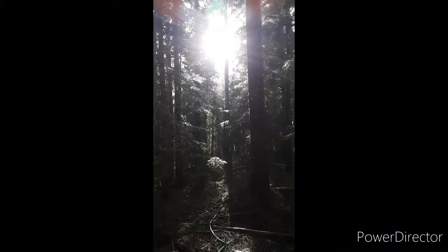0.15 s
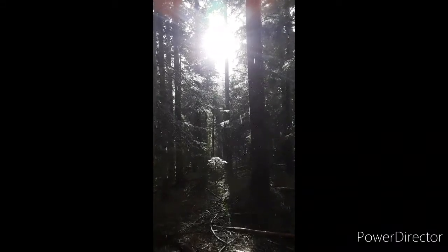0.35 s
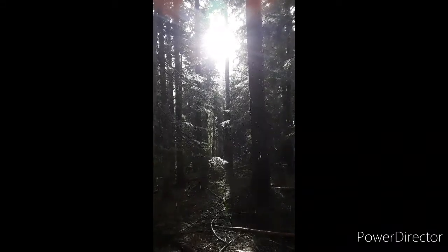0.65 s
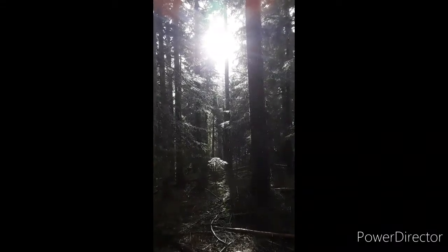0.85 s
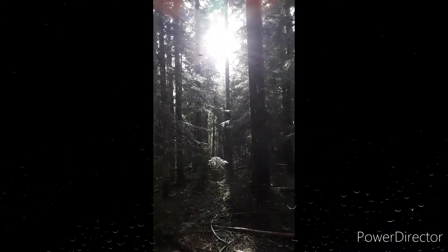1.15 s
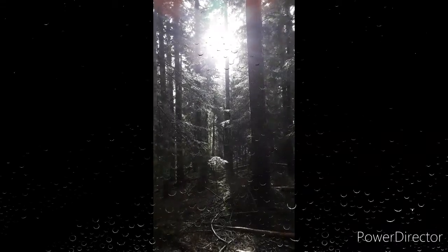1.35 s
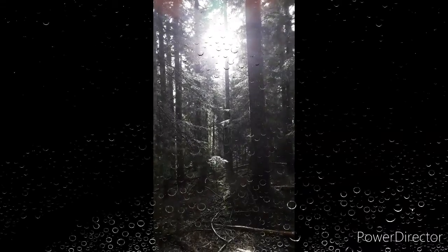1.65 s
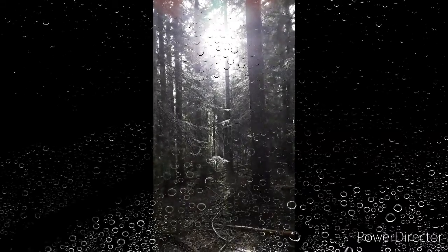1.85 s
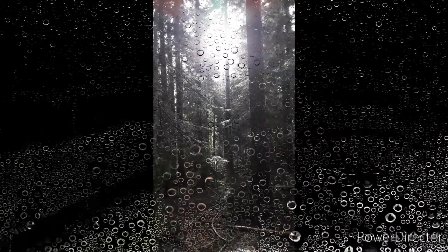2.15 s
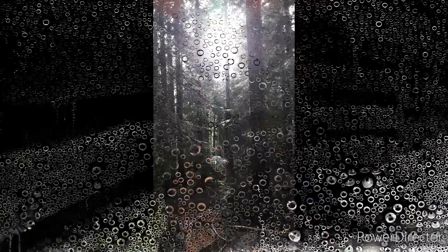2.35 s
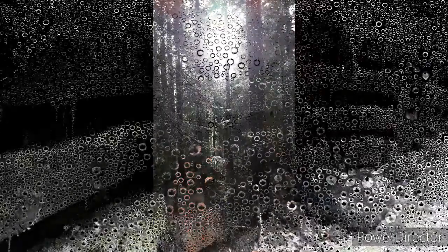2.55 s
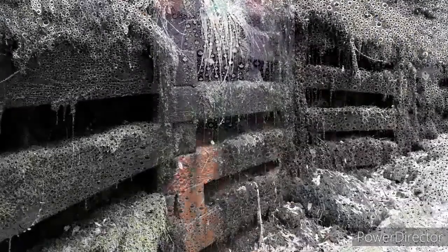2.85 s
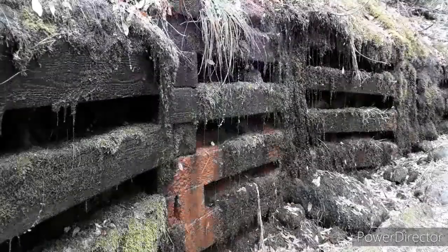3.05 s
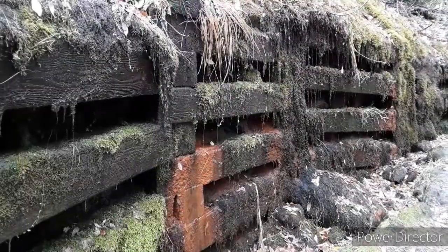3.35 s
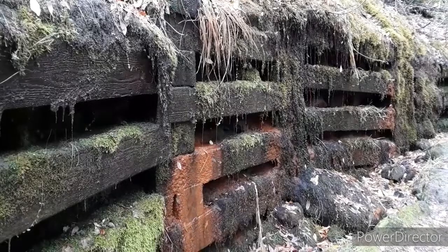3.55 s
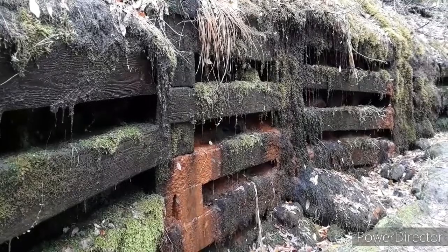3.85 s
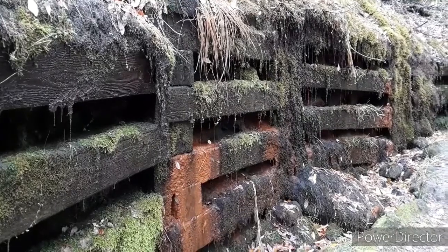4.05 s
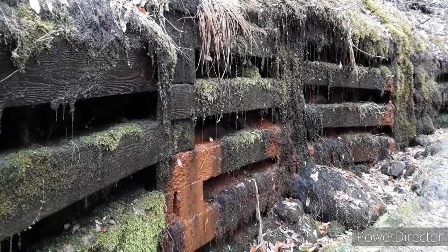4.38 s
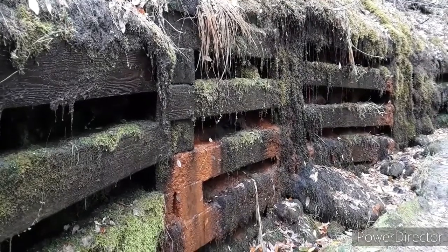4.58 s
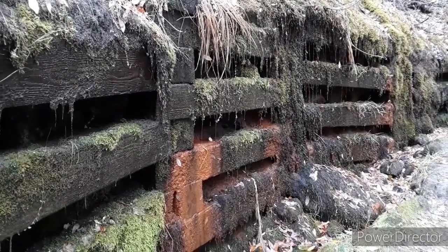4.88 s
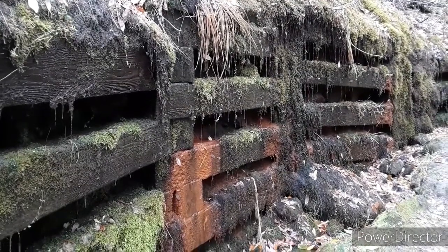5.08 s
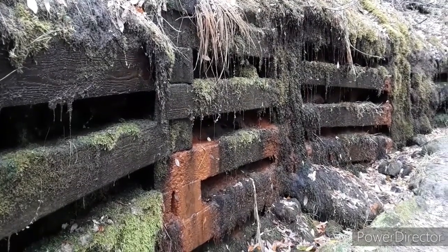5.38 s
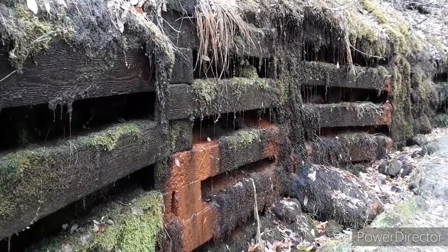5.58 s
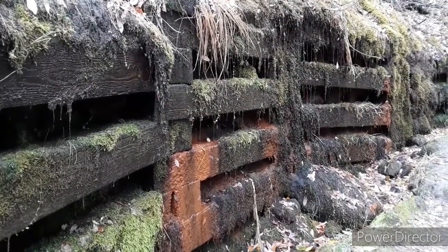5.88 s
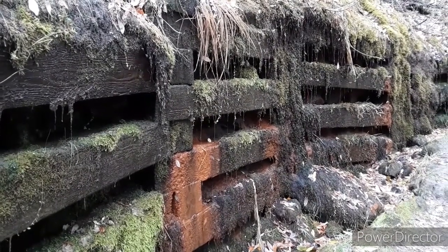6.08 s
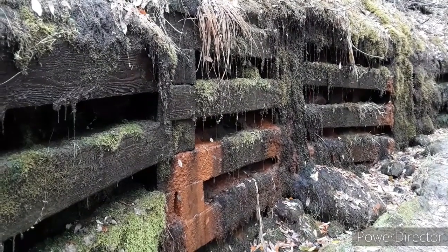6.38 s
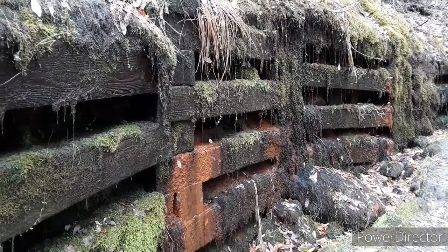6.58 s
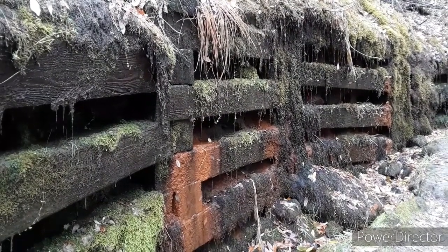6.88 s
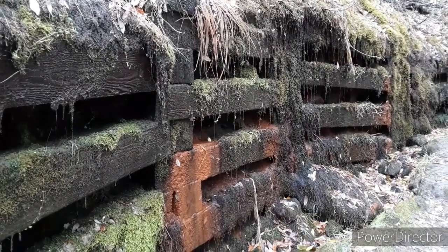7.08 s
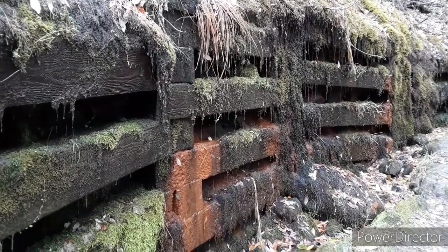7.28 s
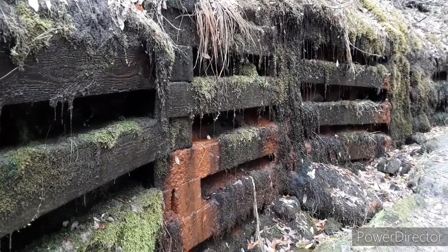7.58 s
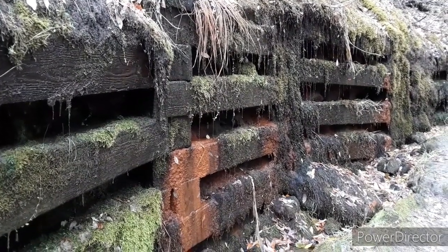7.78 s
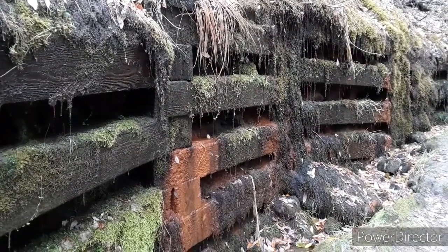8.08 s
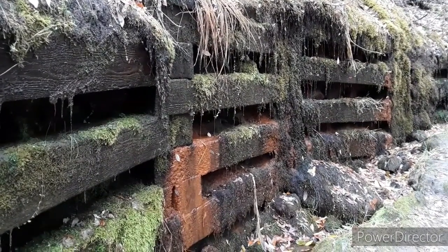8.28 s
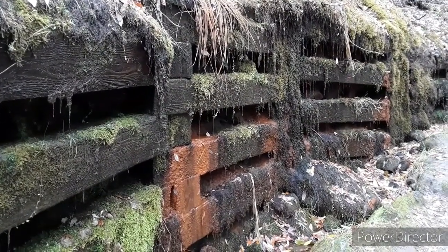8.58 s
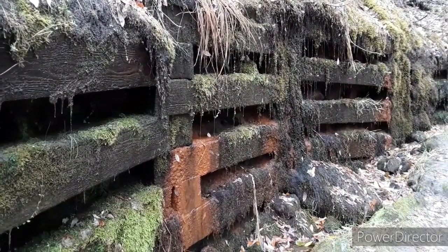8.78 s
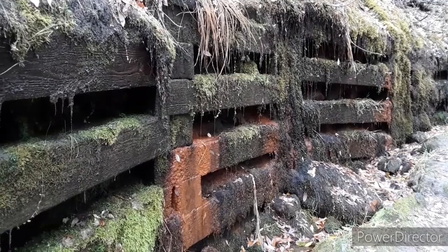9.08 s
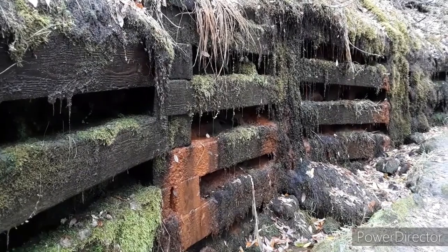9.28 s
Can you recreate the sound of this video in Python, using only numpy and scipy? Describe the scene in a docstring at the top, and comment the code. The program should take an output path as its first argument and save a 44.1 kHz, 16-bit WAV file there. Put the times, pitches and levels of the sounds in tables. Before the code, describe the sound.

A quiet forest rush with scattered leaf ticks cuts abruptly to a close, bubbling trickle, with plopping drops and sharp little splats on wet wood.

```python
"""A mossy timber wall on the left, running with water: drops plop into pools between its beams and
splat on wet wood, over a bubbling trickle, a fine patter and a stream. Before it, after a very short
silence, comes another wet place: a distant stream and sparse drops ticking on leaf litter.
Bubbles are decaying sines that climb in pitch, impacts are brief noise bursts, streams are shaped noise;
drops and running water get short diffuse echoes."""
import sys
import numpy as np
from scipy import signal
from scipy.fft import rfft, irfft, next_fast_len
from scipy.io import wavfile
from scipy.ndimage import map_coordinates

SR = 44100
rng = np.random.default_rng(int(sys.argv[2]) if len(sys.argv) > 2 else 0)


def dump(signal):
    """Clip the signal to [-1, 1] and save it as 16-bit WAV at the path in sys.argv[1]."""
    limited = np.clip(np.atleast_2d(signal).T, -1, 1)
    pcm = np.round(limited * 32767).astype(np.int16)
    wavfile.write(sys.argv[1], SR, pcm)


N = 415863

# the forest floor stops, the wall starts [s]; upper limit of the sound [Hz]
LEAVE_S, ARRIVE_S = 1.964, 2.022
TOP_HZ = 15700
# lesser drops differ by chance: in level [dB], and in life [log units]
DROP_SPREAD_DB, LIFE_SPREAD = 1.5, .3
# the wall's sound, big drops apart, fades in to a steady level, then only wavers
STEADY_DB, FADE_IN_DB, FADE_IN_S = 1, 8.5, 0.19
# slow waver in level of the wall's sound and of the forest's rush: depth [dB], knots per second
WAVER_DB, WAVER_PER_S = 0.33, 1.82
# splats: left over right [dB], scale of the droplets' random flight time [s], length of the ping [cycles]
SPLAT_PAN_DB, SPATTER_FLIGHT_S, PING_CYCLES = 9.5, .006, 12
# the higher a leaf rings, the lighter it is and the less it stirs the litter
LITTER_DB_PER_OCTAVE = -8

# steady rush among the trees, relative spectrum: [f/Hz, level/dB]
FOREST_SPECTRUM = [(25, -53), (60, -6), (130, -4), (230, -6.5), (370, 0.5), (520, 0.5), (780, 5.5),
                   (1500, 2), (1950, 6), (2600, -2), (3800, -9), (5200, -8.5), (6500, -9), (9000, -7.5),
                   (15000, -6)]
# likeness of left and right in the forest's rush: [f/Hz, correlation -1..1]
FOREST_CORRELATION = [(80, 0.82), (280, 0.91), (750, 0.73), (1300, 0.4), (2000, -0.18), (3500, -0.021)]
# lean of the forest's rush, mostly to the right: [f/Hz, left-right level/dB]
FOREST_LEAN = [(300, -1), (900, -1), (2000, -6), (3800, 0), (6300, -5), (9000, 0)]
# low part of the forest's rush, rising and falling: [t/s, level/dB]
LOW_RUSH_LEVEL = [(0, -62), (.45, -76), (.68, -68), (.78, -56), (.9, -68), (1.5, -66), (1.96, -63.5)]
# thin high hiss at the start, its fade: [t/s, level/dB]
HISS_FADE = [(0, -61), (.22, -60), (.29, -90)]
# narrow band of that hiss, relative spectrum: [f/Hz, level/dB]
HISS_SPECTRUM = [(7200, -60), (7750, -3), (8000, 0), (8500, -6), (9200, -60)]
# loudest drops on leaf litter:
# [t/s, tick level/dB, ring level/dB, leaf or twig f/Hz, treble snap level/dB]
LEAF_DROPS = [(0.0897, -31, -30, 1750, -53), (0.1872, -39, -35, 6650, -42), (0.1939, -36, -45, 6600, -31),
              (0.232, -42, -41, 4200, -48), (0.434, -33, -35, 6100, -45), (0.586, -38, -42, 5350, -43),
              (0.6205, -47, -50, 6400, -30), (0.717, -42, -42, 6100, -35), (0.7285, -35, -44, 6000, -36),
              (0.76, -46, -37, 3200, -51), (0.9176, -37, -32, 6750, -35), (0.9597, -43, -34, 1800, -46),
              (1.1351, -31, -42, 6900, -38), (1.1898, -34, -36, 6000, -42), (1.376, -40, -48, 7400, -34),
              (1.5076, -31, -33, 2700, -52), (1.6487, -27, -29, 6250, -32), (1.657, -35, -44, 1650, -40),
              (1.7963, -33, -39, 6900, -37), (1.8246, -24, -25.5, 2350, -41)]
# colour of a drop on a stiff leaf: [f/Hz, level/dB]
LEAF_COLOUR = [(500, -18), (1500, -6), (3500, -0.5), (5000, 3), (6500, 6.5), (9000, 1.5), (15000, -12)]
# colour of the litter giving way under the drop: [f/Hz, level/dB]
LITTER_COLOUR = [(300, -26), (1100, -12), (1900, 0), (2800, -2), (4000, -3), (6000, -11), (12000, -30)]
# stream behind the wall, relative spectrum: [f/Hz, level/dB]
STREAM_SPECTRUM = [(25, -17), (50, -13.5), (80, -4.5), (125, 2.5), (230, -2), (380, 3), (520, 1.5),
                   (720, 2.5), (1050, 2), (1900, 7), (2700, 1.5), (6500, -3.5), (9000, -7), (15000, -2)]
# likeness of left and right in the stream: [f/Hz, correlation -1..1]
STREAM_CORRELATION = [(80, 0.97), (260, 0.88), (500, 0.4), (800, 0.32), (1150, -0.52), (2500, -0.027)]
# colour of the fine patter: [f/Hz, level/dB]
PATTER_COLOUR = [(150, -20), (400, -24), (1000, 6.5), (2000, -4.5), (2800, -0.5), (3600, 5), (5000, -0.5),
                 (6600, 8.5), (9000, 5.5), (15000, 2.5)]
# resonant hollows between the beams: [f/Hz, bandwidth/Hz, level/dB]
BEAM_HOLLOWS = [(1418, 300, 6.5), (1970, 350, 7.5), (2140, 110, 1)]
# pinhead bubbles bursting close by: [t/s, level/dB, f/Hz]
PINHEAD_BUBBLES = [(3.511, -29, 14460), (3.759, -32, 14130), (4.362, -30, 12920), (5.676, -33, 13090),
                   (6.636, -32, 11980), (6.74, -35, 12830)]
# loudest drops that burst on wet wood: [t/s, level/dB, f/Hz, spatter level/dB]
WOOD_SPLATS = [(2.089, -34, 6500, -45), (2.271, -39, 3100, -48), (2.554, -36, 6800, -47),
               (2.724, -35, 3610, -53), (2.754, -35, 3400, -51), (2.964, -37, 3680, -52),
               (3.086, -38, 4050, -53), (3.195, -34, 5330, -54), (3.21, -37, 4430, -53),
               (3.247, -36, 3660, -54), (3.285, -36, 5510, -54), (3.295, -37, 3100, -54),
               (3.304, -37, 4180, -54), (3.358, -38, 4000, -53), (3.5181, -26, 3700, -51),
               (3.675, -34, 3960, -53), (3.7445, -34, 4180, -52), (4.0041, -27.5, 4100, -46),
               (4.124, -36, 3250, -50), (4.234, -35, 4220, -54), (4.296, -34, 4250, -48),
               (4.447, -36, 3360, -50), (4.501, -37, 3280, -48), (4.6527, -24, 6510, -53),
               (5.212, -37, 4530, -51), (5.4671, -32, 4930, -53), (5.5079, -37, 3580, -50),
               (5.54, -37, 3790, -54), (5.573, -36, 3100, -52), (5.6, -35, 3670, -50),
               (5.813, -38, 5360, -50), (5.939, -36, 4650, -53), (6.085, -38, 3660, -55),
               (6.2525, -37, 5000, -47), (6.2605, -33, 4800, -45), (6.338, -37, 5800, -47),
               (6.348, -31, 4480, -50), (6.3981, -24.5, 3600, -53), (6.45, -35, 5000, -44),
               (6.553, -36, 4400, -51), (6.588, -34, 4500, -48), (6.742, -34, 4250, -47),
               (6.765, -37, 3620, -55), (6.842, -36, 3100, -54), (6.8553, -28, 5550, -50),
               (7.0087, -35, 3110, -49), (7.175, -36, 4730, -48), (7.7331, -28, 3710, -53),
               (7.7989, -26, 4400, -47), (7.948, -34, 6370, -50), (8.184, -35, 4220, -53),
               (8.2666, -34, 4510, -47), (8.33, -35, 4290, -50), (8.4209, -32, 3250, -51),
               (8.441, -35, 5470, -53), (8.6495, -35, 3910, -52), (8.724, -35, 4240, -50),
               (9.0125, -28, 3660, -43), (9.0387, -29, 5150, -42), (9.059, -36, 4410, -51),
               (9.1029, -28, 6800, -45), (9.3081, -30, 3400, -47), (9.332, -35, 5990, -54),
               (9.402, -35, 4220, -54)]
# loudest drops that trap a bubble in pooled water: [t/s, level/dB, f/Hz, life/s]
POOL_PLOPS = [(2.11, -36, 1980, .007), (2.202, -33, 1720, .012), (2.5369, -25, 2210, .005),
              (2.5777, -26, 1390, .005), (2.766, -34, 1335, .006), (2.7684, -30, 2100, .003),
              (2.877, -36, 2300, .006), (2.908, -37, 1680, .007), (2.941, -34, 2100, .006),
              (2.9686, -32, 2200, .004), (3.077, -38, 1440, .006), (3.2234, -30, 2020, .005),
              (3.319, -36, 1500, .006), (3.319, -35, 2100, .007), (3.4851, -23, 1420, .006),
              (3.528, -35, 1450, .007), (3.679, -36, 2410, .005), (3.7434, -28.5, 1950, .0035),
              (4.1225, -32, 1950, .006), (4.353, -35, 1450, .007), (4.365, -33, 1460, .013),
              (4.48, -36, 1590, .007), (4.689, -38, 1335, .007), (5.044, -34, 1980, .006),
              (4.501, -33, 1940, .01), (4.575, -34, 1910, .005), (4.61, -36, 1300, .008),
              (4.7237, -25, 1810, .007), (4.858, -38, 1450, .006), (4.93, -45, 660, .012),
              (5.0611, -31, 2090, .01), (5.277, -33, 2230, .006), (5.332, -33, 2420, .007),
              (5.335, -39, 1340, .006), (5.5083, -21, 1940, .0045), (5.578, -37, 1420, .006),
              (5.7773, -31, 1870, .0035), (5.798, -37, 1310, .007), (6.081, -36, 1520, .006),
              (6.103, -35, 2160, .005), (6.157, -35, 1760, .005), (6.3485, -30, 1750, .0025),
              (6.385, -45, 780, .012), (6.412, -38, 1335, .006), (6.4369, -27, 1870, .004),
              (6.589, -32, 1320, .012), (6.668, -34, 2030, .006), (6.68, -36, 1680, .006),
              (6.7627, -33, 2200, .007), (6.861, -33, 1970, .005), (7.0091, -23, 2080, .005),
              (7.1891, -29, 2130, .004), (7.21, -32, 2020, .006), (7.2512, -30, 2170, .007),
              (7.324, -37, 1420, .007), (7.344, -35, 1320, .012), (7.522, -36, 1380, .008),
              (7.736, -34, 1940, .005), (7.825, -35, 1430, .007), (7.955, -33, 2010, .005),
              (8.084, -44, 780, .014), (8.1115, -31, 2000, .006), (8.499, -35, 2320, .005),
              (8.532, -35, 2050, .005), (8.571, -33, 1940, .005), (8.648, -21, 2000, .002),
              (8.67, -35, 1890, .005), (8.8159, -27, 2380, .0035), (8.86, -35, 1820, .005),
              (8.8617, -33, 1300, .012), (8.91, -36, 1340, .005), (8.9587, -23, 1790, .01),
              (9.024, -35, 2010, .005), (9.259, -38, 1450, .006), (9.3088, -24, 2140, .0035),
              (9.344, -33, 1150, .012), (9.407, -32, 1640, .009)]
# high plop notes are shaded from the right side: [f/Hz, left-right level/dB]
RIGHT_SHADE = [(700, -2), (1100, 2), (1400, 16), (2000, 16)]
# colour of a drop smacking on water: [f/Hz, level/dB]
SMACK_COLOUR = [(300, -35), (1200, -14), (2500, 1), (4500, -1), (7000, -1), (15000, -12)]
# scatter from timber and trees: [f/Hz, 60 dB decay time/s]
SCATTER_DECAY = [(300, 0.1), (2000, 0.1), (7000, 0.069), (14000, 0.064)]
# treble loss in the microphone: [f/Hz, level/dB]
MICROPHONE_COLOUR = [(6800, -1.5), (7400, -8.5), (8200, -10), (12000, -9), (15500, -15)]


def amp(db):
    """Decibels to gain."""
    return 10 ** (np.asarray(db) / 20)


def unit(x):
    """Scale to rms 1."""
    return x / np.sqrt(np.mean(x ** 2) + 1e-20)


def along(points, hz):
    """(Hz, value) points read on a log axis."""
    f, v = np.transpose(points)
    return np.interp(np.log(hz + 1), np.log(f + 1), v)


def curve(points):
    """(s, value) points joined by straight lines, one value per sample."""
    return np.interp(np.arange(N) / SR, *np.transpose(points))


def wobble(rate):
    """A smooth random curve, rate knots a second."""
    knots = rng.standard_normal(int(N * rate / SR) + 4)
    return map_coordinates(knots, [np.arange(N) * rate / SR])


def sides(pan_db):
    """Gains of the two channels, the left one louder by pan_db."""
    return amp(np.array([[.5], [-.5]]) * pan_db)


def filtered(x, response):
    """x times a response of frequency."""
    m = next_fast_len(N + SR // 2)
    return irfft(rfft(x, m) * response(np.fft.rfftfreq(m, 1 / SR)), m)[..., :N]


def coloured(x, points):
    """Causal minimum-phase filter with the gain of (Hz, dB) points, so that attacks stay sharp."""
    size = 1024
    cepstrum = irfft(np.log(amp(along(points, np.fft.rfftfreq(size, 1 / SR)))))
    # fold the cepstrum onto positive times
    cepstrum[1:size // 2] *= 2
    cepstrum[size // 2 + 1:] = 0
    impulse = irfft(np.exp(rfft(cepstrum)))
    return signal.oaconvolve(x, impulse[None], axes=1)[:, :N]


def rush(spectrum, correlation):
    """Stereo noise of rms 1; the mix of mid and side sets how alike the channels are."""
    def mid_side_gains(hz):
        turn = np.arccos(np.clip(along(correlation, hz), -1, 1)) / 2
        return amp(along(spectrum, hz)) * [np.cos(turn), np.sin(turn)]

    mid, side = filtered(rng.standard_normal((2, N)), mid_side_gains)
    return unit(np.array([mid + side, mid - side]))


def ring(hz, life, rise, size):
    """One row per bubble: it swells within a cycle, climbs in pitch by rise and dies over its life."""
    t = np.arange(size) / SR
    hz, life = hz[:, None], life[:, None] + 1e-5
    age = t / life
    phase = 2 * np.pi * hz * t * (1 + rise * np.tanh(age / 2))
    swell = 1 - np.exp(-2 * hz * t)
    return np.sin(phase) * swell * np.exp(-age ** 2)


def spray(count, life, size):
    """One row per impact: a burst of noise that dies at once."""
    return rng.standard_normal((count, size)) * np.exp(-np.arange(size) / SR / life)


def placed(rows, s, left_db, right_db, lag_s):
    """Lay each row at its time; the right side is offset by lag_s (negative leads) with a random spread."""
    size = rows.shape[1]
    lag = np.round(SR * (lag_s + 0.00011 * rng.standard_normal(len(s)))).astype(int)
    start = np.round(s * SR).astype(int)

    def lay(at, db):
        where = np.maximum(at, 0)[:, None] + np.arange(size)
        return np.bincount(where.ravel(), (rows * amp(db)[:, None]).ravel(), N)[:N]

    return np.array([lay(start, left_db), lay(start + lag, right_db)])


def scattered(x, wet_db):
    """Add short diffuse echoes; drops land in different spots, so each stretch gets its own pattern."""
    size, length = SR // 30, SR // 8
    count = N // size + 1
    # noise tails that decay at a different rate in each band
    hz, t, z = signal.stft(rng.standard_normal((2, count, length)), SR, nperseg=128)
    decay = amp(-60 * t / along(SCATTER_DECAY, hz)[:, None])
    tails = signal.istft(z * decay, SR, nperseg=128)[1]
    tails /= np.linalg.norm(tails, axis=2, keepdims=True)
    tails = np.pad(tails, ((0, 0), (0, 0), (SR // 500, 0)))  # 2 ms before the first echo
    stretches = np.pad(x, ((0, 0), (0, count * size - N))).reshape(2, count, size)
    echoes = signal.fftconvolve(stretches, tails, axes=2)
    where = (size * np.arange(count)[:, None] + np.arange(echoes.shape[2])).ravel()
    wet = np.array([np.bincount(where, side.ravel())[:N] for side in echoes])
    return x + amp(wet_db) * wet


def crackle(count, life, spread_db, pan_db):
    """Pitchless clicks of tiny droplets at random times."""
    s = rng.uniform(0, N / SR, count)
    db = spread_db * np.minimum(rng.standard_normal(count), 2)
    right_db = db - pan_db - 3 * rng.standard_normal(count)
    return unit(placed(spray(count, life, size=160), s, db, right_db, lag_s=0))


def shower(count, pitch_hz, spread, cycles, spread_db, pan_db, rise, size):
    """Many small drops at random times, each with its own pitch, life, size and direction."""
    s = rng.uniform(0, N / SR, count)
    pitch, life, level, pan = rng.standard_normal((4, count))
    hz = np.minimum(pitch_hz * np.exp(spread * pitch), TOP_HZ)
    rows = ring(hz, cycles * np.exp(0.065 * life) / hz, rise, size)
    db = spread_db * np.minimum(level, 2)  # the biggest drops are rare and bounded in size
    return unit(placed(rows, s, db, db - pan_db - 3 * pan, lag_s=-.0003))


def forest_air():
    """The steady rush among the trees, a low rush that rises and falls and a brief thin hiss: shaped noise."""
    steady = rush(FOREST_SPECTRUM, FOREST_CORRELATION)
    steady = filtered(steady, lambda hz: sides(along(FOREST_LEAN, hz)))
    low_band = [(60, -30), (120, -2), (350, 0), (600, -30)]  # f/Hz, level/dB
    low = amp(curve(LOW_RUSH_LEVEL)) * rush(low_band, FOREST_CORRELATION)
    hiss = amp(curve(HISS_FADE)) * sides(3) * rush(HISS_SPECTRUM, FOREST_CORRELATION)
    return amp(-47.5 + WAVER_DB * wobble(WAVER_PER_S)) * steady + low + hiss


def leaf_drops():
    """A drop on leaf litter: a treble snap, a tick, the short ring of a leaf or twig, the litter giving way."""
    s, tick_db, ring_db, hz, snap_db = np.transpose(LEAF_DROPS)

    def drop(rows, level):
        return placed(rows, s, level - 2.0, level, lag_s=0)  # a little to the right

    def contact():
        return spray(len(s), life=.0011, size=400)

    ticks = coloured(drop(contact(), tick_db), LEAF_COLOUR)
    rings = drop(ring(hz, np.full(len(s), .0015), rise=0, size=400), ring_db)
    litter_db = ring_db + 3 + LITTER_DB_PER_OCTAVE * np.log2(hz / 2000)
    litter = coloured(drop(contact(), litter_db), LITTER_COLOUR)
    snap = drop(np.diff(contact(), 2), snap_db)  # differencing twice leaves mostly treble
    return scattered(ticks + rings + litter + snap, wet_db=-10)


def forest():
    """A far stream under the trees, drops on the leaf litter and a faint crackle of tiny ones."""
    clicks = crackle(count=1700, life=0.0024, spread_db=4.5, pan_db=-1.5)
    far = amp(-59.0) * unit(coloured(clicks, LEAF_COLOUR))
    return leaf_drops() + far + forest_air()


def stream():
    """The stream behind the wall: steady shaped noise, leaning left."""
    return amp(-46.0) * sides(3.45) * rush(STREAM_SPECTRUM, STREAM_CORRELATION)


def gurgle():
    """Larger, soft bubbles in the runoff at the foot of the wall, lower in pitch and to the right."""
    return amp(-68.5) * shower(count=1300, pitch_hz=688, spread=0.15, cycles=6.3, spread_db=3.0,
                               pan_db=-8.0, rise=0.048, size=1300)


def spurts(count, life, depth):
    """Water comes off the moss in spurts that start at once and ebb: a gain of rms 1."""
    kicks = np.bincount(rng.integers(0, N, count), rng.uniform(0, 1, count) ** 2, N)
    power = signal.lfilter([1], [1, -np.exp(-1 / (life * SR))], kicks)
    return unit(np.sqrt(1 + depth * power))


def patter():
    """Fine droplets and tiny bubbles all over the moss: very short rings, noise clicks and longer rings."""
    droplets = shower(count=5500, pitch_hz=4000, spread=0.46, cycles=1.4, spread_db=4.5,
                      pan_db=9.5, rise=0, size=120)
    fizz = shower(count=1400, pitch_hz=4100, spread=.27, cycles=6, spread_db=3.3,
                  pan_db=10, rise=.015, size=300)
    clicks = crackle(count=420, life=0.001, spread_db=2.0, pan_db=-5.5)
    fine = unit(coloured(droplets + amp(-0.5) * clicks, PATTER_COLOUR))
    return amp(-56.5) * fine + amp(-59) * fizz


def trickle():
    """Small bubbles between the beams; those in tune with the hollows ring loudest."""
    bubbles = shower(count=2500, pitch_hz=1830, spread=.2, cycles=6.8, spread_db=3.1,
                     pan_db=20, rise=.03, size=600)

    def hollows(f):
        return sum(amp(db) * 1j * f * width / (centre ** 2 - f * f + 1j * f * width)
                   for centre, width, db in BEAM_HOLLOWS)

    return amp(-50.0) * unit(filtered(bubbles, hollows))


def tinks():
    """Pinhead bubbles ring for an instant, very high."""
    s, db, hz = np.transpose(PINHEAD_BUBBLES)
    rows = ring(hz, np.full(len(s), .0025), rise=.015, size=500)
    return placed(rows, s, db, db - SPLAT_PAN_DB, lag_s=-.0003)


def splats(count=14):
    """A drop bursts on wet wood with a short high ping; count droplets thrown off it land just after."""
    s, db, hz, spatter_db = np.transpose(WOOD_SPLATS)
    pings = ring(hz, PING_CYCLES / hz, rise=.015, size=700)
    bursts = spray(len(s), life=.0014, size=700)
    rows = amp(2.5) * pings + amp(-8) * bursts
    impact = placed(rows, s, db, db - SPLAT_PAN_DB, lag_s=-0.00025)
    s, hz, spatter_db = np.repeat([s, hz, spatter_db], count, axis=1)
    flight = 0.000992 + SPATTER_FLIGHT_S * rng.gamma(1.3, size=len(s))
    pitch, level = rng.standard_normal((2, len(s)))
    droplets = ring(hz * np.exp(.2 * pitch), np.full(len(s), .0006), rise=0, size=160)
    db = spatter_db + 8.5 + 3 * level
    # the spatter sits nearer the middle than the impact
    return impact + placed(droplets, s + flight, db, db - SPLAT_PAN_DB + 5.5, lag_s=-0.00029)


def drips(count, level_db, pitch_hz, spread, life):
    """Lesser drops around one pitch, falling at random times: rows (s, level dB, pitch Hz, life s)."""
    s = rng.uniform(0, N / SR, count)
    size, pitch, length = rng.standard_normal((count, 3)).T
    db = level_db + DROP_SPREAD_DB * size
    hz = pitch_hz * np.exp(spread * pitch)
    return np.transpose([s, db, hz, life * np.exp(LIFE_SPREAD * length)])


def plops():
    """A drop smacks the pool, its bubble rings near its hollow's pitch; heavy, short drops smack much harder."""
    high = drips(count=90, level_db=-41.5, pitch_hz=2030, spread=.09, life=.007)
    low = drips(count=30, level_db=-44.5, pitch_hz=1420, spread=.05, life=.008)
    s, db, hz, life = np.vstack([POOL_PLOPS, high, low]).T
    rings = ring(hz, life, rise=.025, size=1800)
    bubbles = placed(rings, s, db, db - along(RIGHT_SHADE, hz), lag_s=-.0003)
    smack_db = db - 9 + .45 * (db - np.median(db)) - 8 * np.log10(life / .005)
    bursts = spray(len(s), life=.0006, size=200)
    smacks = placed(bursts, s, smack_db, smack_db - 8, lag_s=-.0003)
    return bubbles + coloured(smacks, SMACK_COLOUR)


def wall():
    """The dripping wall, its echoes and the stream behind it; all but the big drops and tinks fade in."""
    since = np.maximum(np.arange(N) / SR - ARRIVE_S, 0)
    fade_db = STEADY_DB - FADE_IN_DB * np.exp(-since / FADE_IN_S)
    fade = amp(fade_db + WAVER_DB * wobble(WAVER_PER_S))
    gush = fade * spurts(count=800, life=0.0046, depth=3.1)
    running = scattered(gush * patter() + fade * gurgle(), wet_db=4.0)
    plinks = scattered(fade * trickle(), wet_db=-7)
    drops = scattered(plops() + splats() + tinks(), wet_db=-11)
    return running + plinks + drops + np.sqrt(fade) * stream()  # the stream fades half as deep in dB


def scene():
    """The forest floor, a moment of silence, then the wall."""
    t = np.arange(N) / SR
    return forest() * (t < LEAVE_S) + wall() * (t > ARRIVE_S)


def record(dry):
    """Microphone colour, a gentle bass roll-off and a steep band limit at TOP_HZ."""
    low_cut_hz = 45  # handling rumble is kept out

    def band(hz):
        bass_cut = 1j * hz / (low_cut_hz + 1j * hz)
        return bass_cut / (1 + (hz / TOP_HZ) ** 120)

    return filtered(coloured(dry, MICROPHONE_COLOUR), band)


dry = scene()
out = record(dry)
dump(out)
```